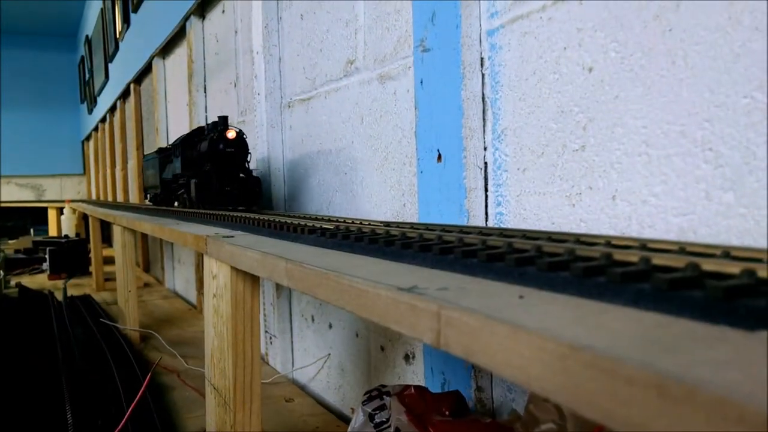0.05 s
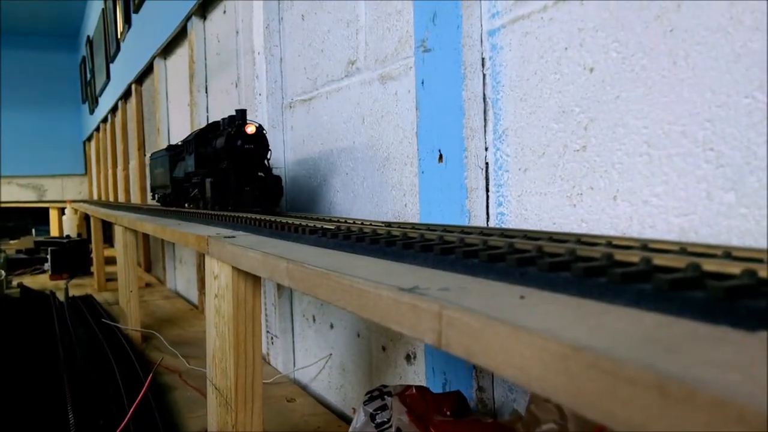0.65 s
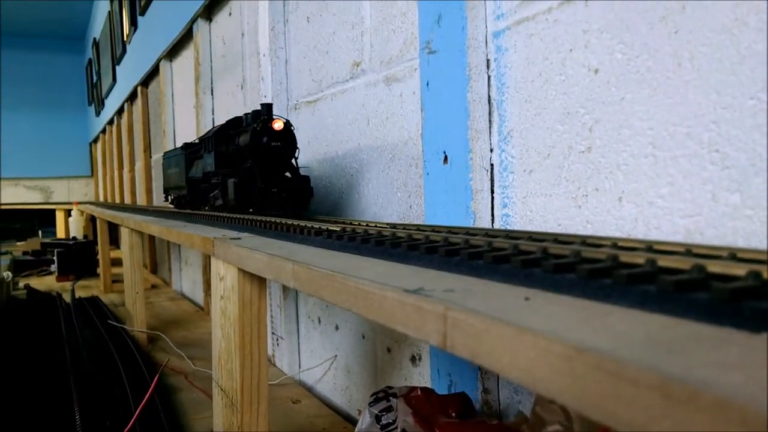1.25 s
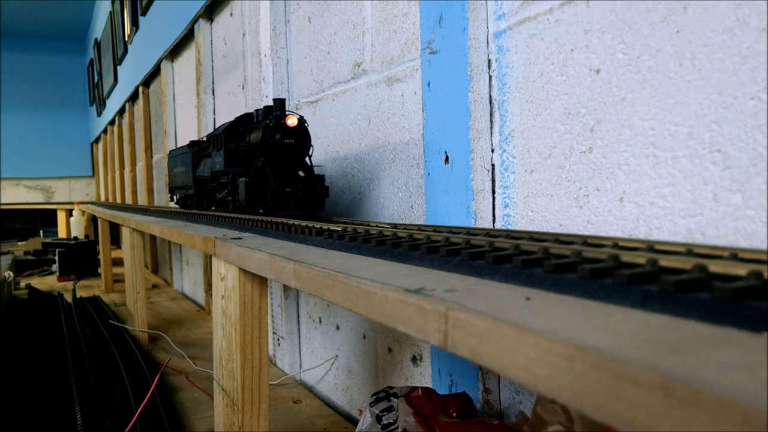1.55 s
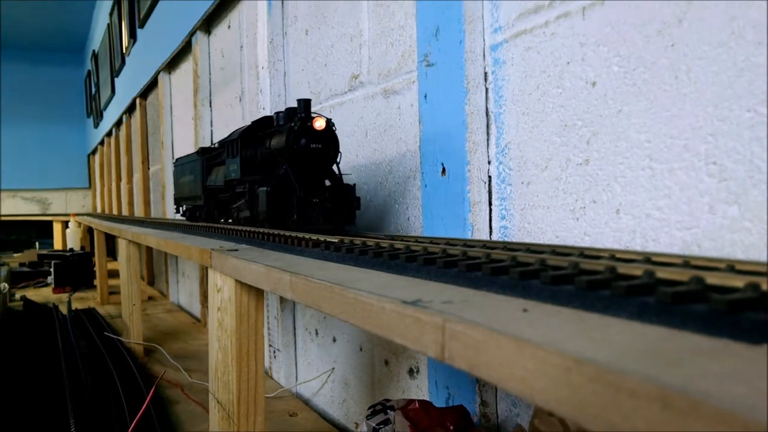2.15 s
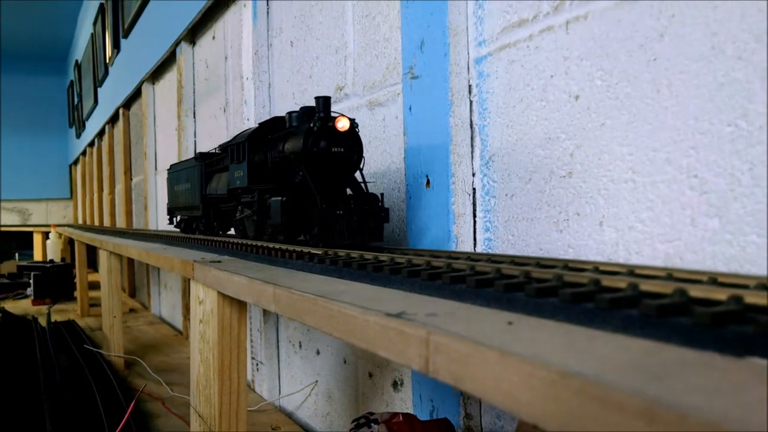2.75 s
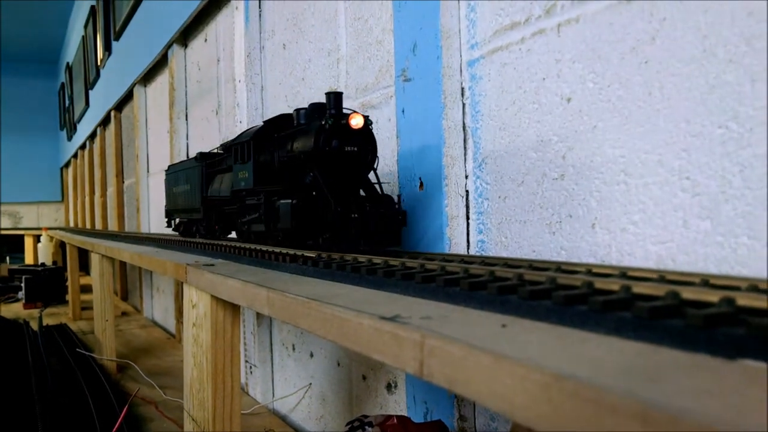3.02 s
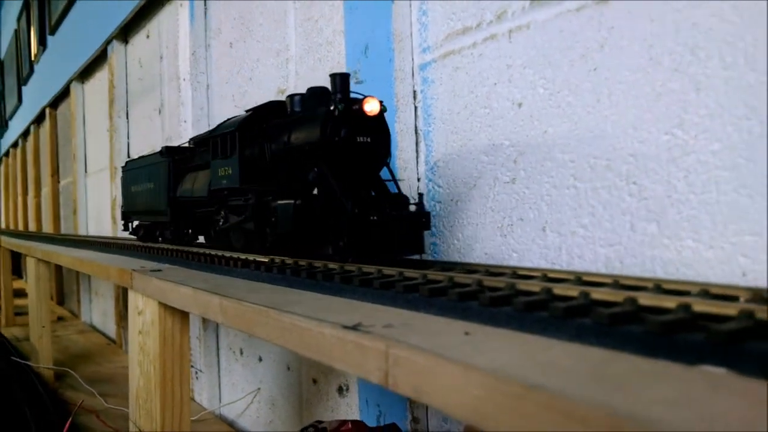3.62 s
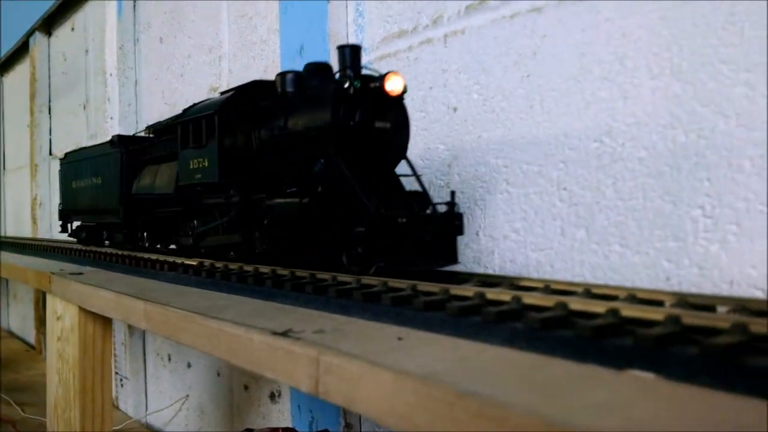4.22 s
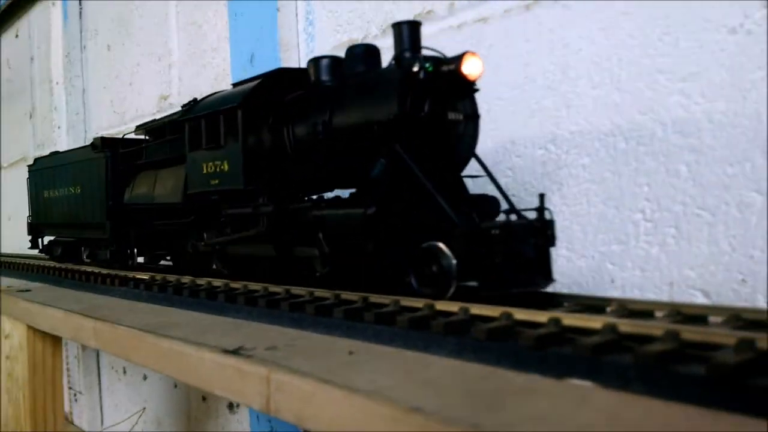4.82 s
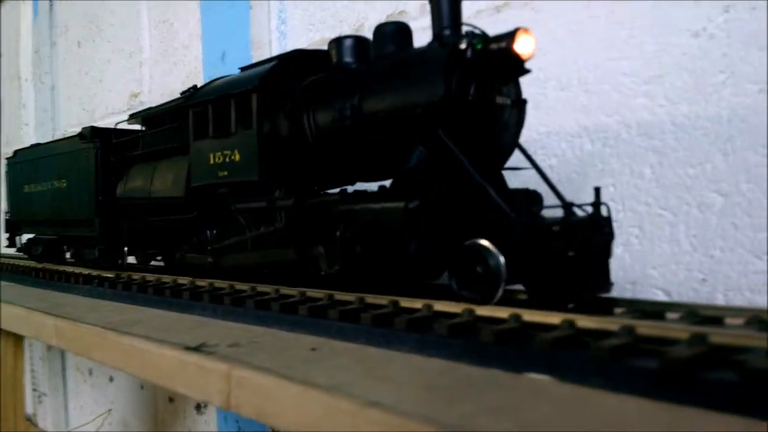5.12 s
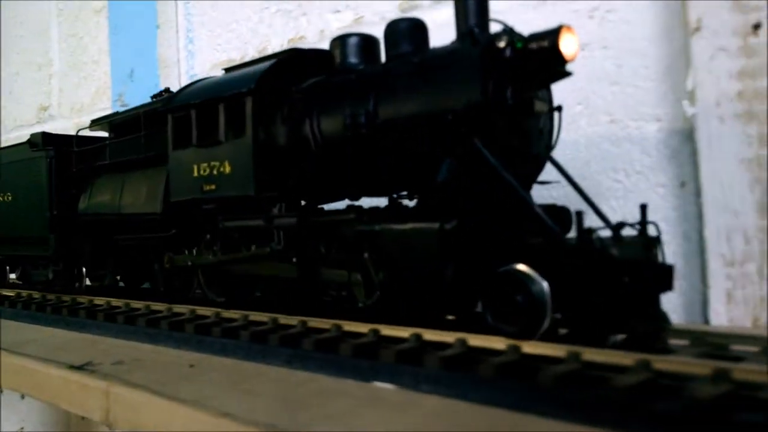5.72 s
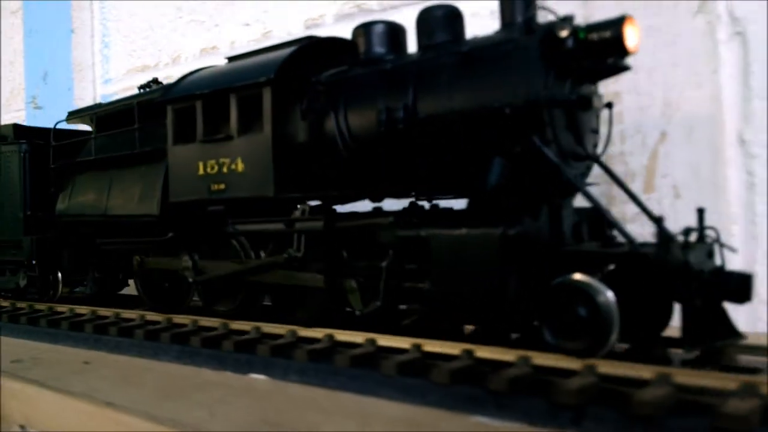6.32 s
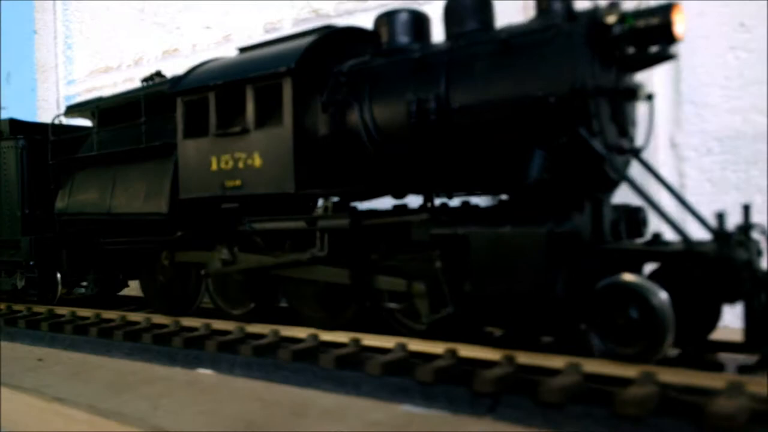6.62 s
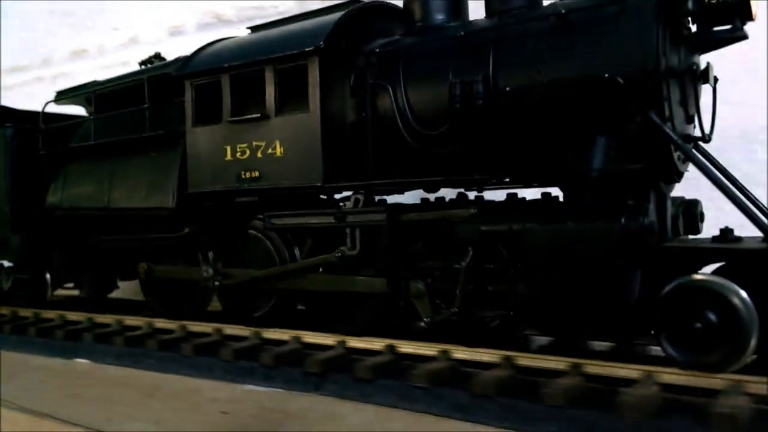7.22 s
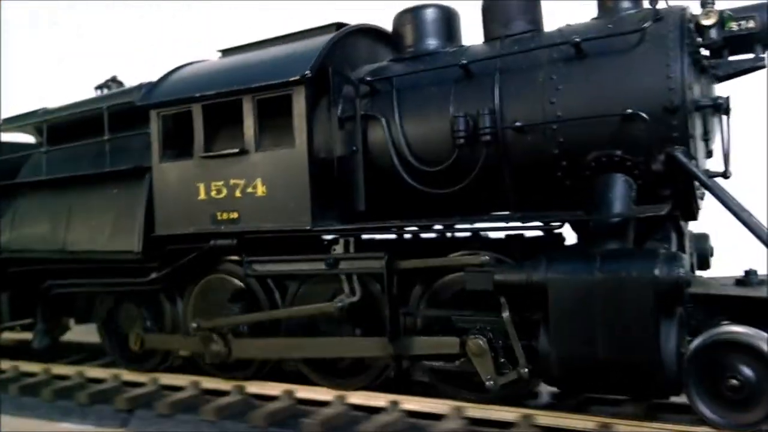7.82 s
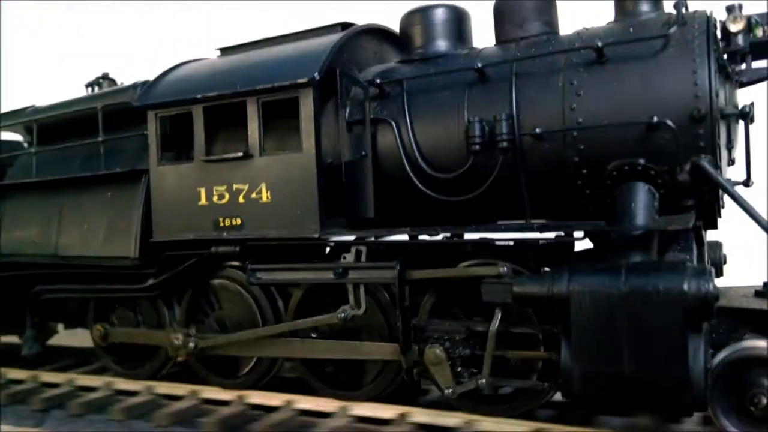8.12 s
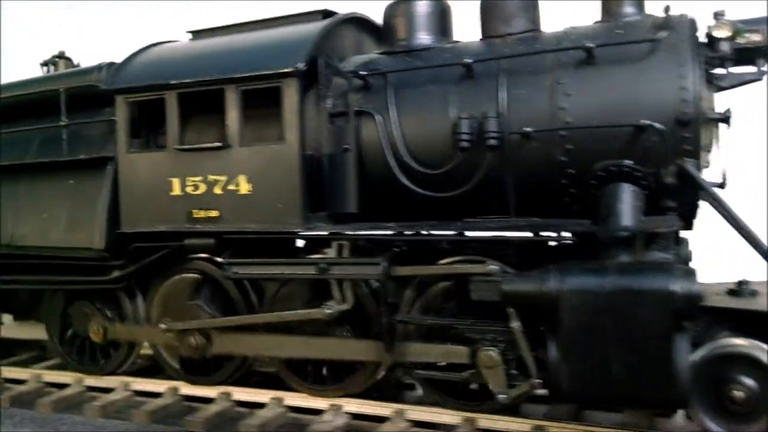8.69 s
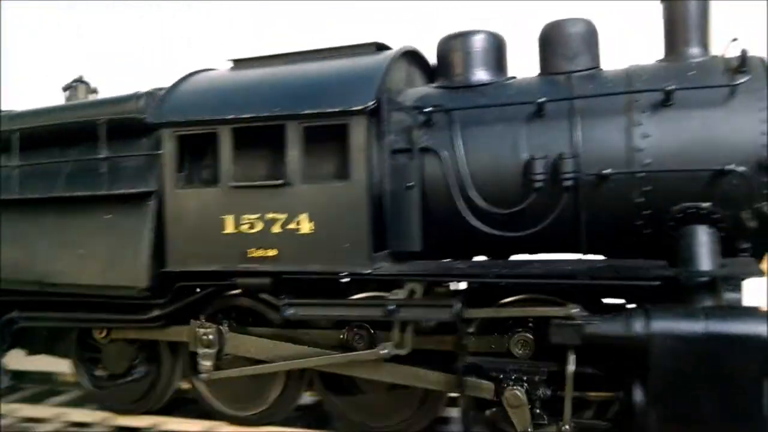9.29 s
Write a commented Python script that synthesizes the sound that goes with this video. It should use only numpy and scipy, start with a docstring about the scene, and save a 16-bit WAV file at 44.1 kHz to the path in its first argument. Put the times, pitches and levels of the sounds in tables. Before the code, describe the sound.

Heard from right beside the track of an indoor wooden layout, a small electric model train approaches slowly. Whirring gears and an on-and-off whine ride over the low rumble of the baseboard. Fast, high ticking from the motor and the hiss of metal wheels gradually build, joined by scattered clicks, soft thumps and short scrapes. The whine is strongest near the end, when the locomotive is closest.

```python
"""Beside the track of a wooden shelf layout, a model steam locomotive creeps toward the listener.
Its wheels force the baseboard into a rumble and roll over the humps of its bending modes.
They hiss and scrape along the rails, and click and ring as they strike flaws.
The motor shaft ticks and knocks once a turn over the whir of the gears,
and a narrow resonance of the drive whines on and off."""
import sys
import numpy as np
from scipy import signal
from scipy.fft import rfft, irfft, next_fast_len
from scipy.io import wavfile

SR = 44100
rng = np.random.default_rng(int(sys.argv[2]) if len(sys.argv) > 2 else 0)


def put_to_file(sound):
    """Save the sound as 16-bit audio at rate SR, in the file named by the first command-line argument."""
    columns = np.atleast_2d(sound).T  # one column per channel
    safe = np.clip(columns, -1, 1)
    whole_steps = np.round(safe * 32767)
    wavfile.write(sys.argv[1], SR, whole_steps.astype(np.int16))


N = 412335
TIME = np.arange(N) / SR
SPEED_M_PER_S = .14
NEAREST_M, ABREAST_M = 0.58, 1.114  # distance across to the track; travel to its nearest point
USUAL_ROLL_DB = -42
MESH_AT = .795  # share of a turn at which the gears are loudest
TICK_STROKE = dict(place=.192, rise_s=.0006, decay_s=.0015, scatter_db=.6)

# how hard the wheels shake the shelf (time [s], level [dB])
ROLL_FORCE = [(0.0, -39.5), (0.34, -44), (0.85, -40.5), (1.02, -36), (2.21, -39), (2.89, -36.5),
              (3.23, -42), (3.4, -41.5), (4.08, -40.5), (4.93, -38.5), (5.1, -36.5), (5.27, -36.5),
              (6.97, -46), (8.33, -41.5), (8.5, -45.5), (9.35, -40.5)]
# stereo width of the shelf's sound, narrowest near the listener (time [s], side over mid [dB])
SHELF_WIDTH = [(0, 0), (1.5, 0.5), (2.5, 1.5), (3, 2), (4.3, 4), (5.2, 2.5), (6.5, -2), (8, -3.5),
               (9.35, -3)]


def amp(db):
    """Amplitude ratio of a level in decibels."""
    return np.exp(np.asarray(db, np.float32) * np.float32(np.log(10) / 20))


def unit(x):
    """Normalisation to rms 1."""
    return x / np.sqrt(np.mean(x ** 2) + 1e-20)


def curve(rows):
    """Linear interpolation of (time [s], value) rows at every sample."""
    return np.interp(TIME, *np.transpose(rows))


def noise():
    """Two uncorrelated white noises."""
    return rng.standard_normal((2, N), dtype=np.float32)


def drift(rate_hz):
    """Band-limited random fluctuation of rms 1."""
    knots = rng.standard_normal(20000)
    return unit(np.interp(TIME * rate_hz, np.arange(len(knots)), knots))


def colour(x, points):
    """Spectral shaping by (frequency [Hz], gain [dB]) points, falling 30 dB an octave beyond the ends."""
    hz, db = np.transpose(points)
    size = next_fast_len(x.shape[-1] + 2048, True)
    octave, knots = np.log2(np.fft.rfftfreq(size, 1 / SR) + 1), np.log2(hz)
    gain_db = np.interp(octave, np.r_[knots[0] - 4, knots, knots[-1] + 4],
                        np.r_[db[0] - 120, db, db[-1] - 120])
    return irfft(rfft(x.astype(np.float32), size) * amp(gain_db), size)[..., :x.shape[-1]]


def dips(x, rows):
    """Band rejection by bell-shaped notches."""
    hz = np.fft.rfftfreq(1024, 1 / SR)
    db = sum(depth_db * np.exp(-((hz - centre) / width) ** 2) for centre, width, depth_db in rows)
    return signal.oaconvolve(x, np.fft.fftshift(irfft(amp(db)))[1:], "same")


def spread(pair, side_db, right_db=0):
    """Mid-side stereo: the sum and difference of two signals give left and right."""
    side = pair[1] * amp(side_db)
    return np.array([(pair[0] + side) * amp(-right_db / 2), (pair[0] - side) * amp(right_db / 2)])


def ring(hz, width_hz, step=64):
    """A randomly driven resonance: a tone whose amplitude and phase wander (two uncorrelated copies)."""
    phase = (2 * np.pi * (np.cumsum(hz * np.ones(N)) / SR % 1)).astype(np.float32)
    pole = np.exp(-np.pi * width_hz * step / SR)
    slow = unit(signal.lfilter([1], [1, -2 * pole, pole * pole], rng.standard_normal((4, N // step + 2))))
    sway = np.array([np.interp(TIME * SR / step, np.arange(len(row)), row) for row in slow], np.float32)
    return sway[::2] * np.cos(phase) + sway[1::2] * np.sin(phase)


def ping(age, hz, decay_s):
    """Damped free vibration of a struck part."""
    age = np.maximum(age, 0)
    return np.sin(2 * np.pi * hz * age) * np.exp(-age / decay_s)


def approach_gain(near_db, doubling_db, roll_share):
    """Distance law: level falls with each doubling of range; it also follows part of the rolling force."""
    doublings = np.log2(np.hypot(1, (SPEED_M_PER_S * TIME - ABREAST_M) / NEAREST_M))
    return amp(near_db - doubling_db * doublings + roll_share * (curve(ROLL_FORCE) - USUAL_ROLL_DB))


def stroke(turns, place, rise_s, decay_s, scatter_db):
    """Periodic impact at `place` (0-1) in each turn: the seconds since the last blow, and its envelope."""
    count = np.floor(turns - place)
    age = TIME - np.interp(count + place, turns, TIME, left=-1)
    strength = amp(scatter_db * rng.standard_normal(400))[count.astype(int) + 2]
    return age, strength * np.tanh((age / rise_s) ** 2) * np.exp(-age / decay_s)


def contact(age, envelope, spectrum, alike=.55, change_per_s=2.5, size=512):
    """Contact noise: the same spots touch each turn, so part of the grain repeats, changing slowly."""
    passed = TIME * change_per_s
    patterns = rng.standard_normal((2, int(passed[-1]) + 2, size), dtype=np.float32)
    row, blend = passed.astype(int), np.pi / 2 * (passed % 1)
    at = np.round(age * SR).astype(int) % size
    grain = np.cos(blend) * patterns[:, row, at] + np.sin(blend) * patterns[:, row + 1, at]
    friction = np.sqrt(alike) * grain + np.sqrt(1 - alike) * noise()
    return unit(colour(friction * envelope, spectrum))


def room(air_db=-65.0):
    """Noise floor: a faint steady hiss."""
    # spectrum of the hiss (frequency [Hz], gain [dB])
    air_spectrum = [(800, -15), (1400, 15), (2200, -17), (4000, 10), (7000, -20), (9500, 13), (11000, 1),
                    (13000, 10), (15500, -1)]
    return spread(unit(colour(noise(), air_spectrum)) * amp(air_db), side_db=-4, right_db=0.5)


def flange_scrapes(rough_db=3, attack_s=0.0077, release_s=0.092):
    """Sliding friction: a wheel flange rubs the rail for a moment."""
    # flange contacts (time [s], length [s], level [dB])
    rubs = [(0, 0.38, -60.5), (4.1, 0.26, -72), (4.788, 0.071, -57), (5.1, 0.059, -58),
            (6.51, 0.078, -46.5), (9.08, 0.034, -46.5), (9.142, 0.14, -53.5)]
    # friction spectrum (frequency [Hz], gain [dB])
    rub_spectrum = [(2000, -15), (3500, 3), (5000, 8.5), (6300, 5.5), (8000, 6), (10000, 0), (13000, -4),
                    (15500, -3)]
    level = sum(amp(db) * np.clip(np.minimum((TIME - s) / attack_s, 1 + (s + length - TIME) / release_s),
                                  0, 1) for s, length, db in rubs)
    rub = unit(colour(noise() * amp(rough_db * drift(300)), rub_spectrum))
    return spread(rub * level, side_db=-32)


def rail_hiss(flicker_db=1.82, grit_db=-10, grit_per_s=170, grit_size_db=2.6, crush_s=0.0042):
    """Rolling noise: metal wheels hiss on the rails and crush specks of grit."""
    # spectrum of hiss and grit (frequency [Hz], gain [dB])
    hiss_spectrum = [(1200, -2), (2300, 2.5), (3300, 6.5), (4000, 6), (5000, 2), (6500, 1), (8000, -1),
                     (10000, -4.5), (11500, -6), (13000, -6.5), (14700, -2.5), (15500, -9)]
    hiss = unit(colour(noise(), hiss_spectrum)) * amp(flicker_db * drift(60))
    specks = (rng.random(N) < grit_per_s / SR) * amp(grit_size_db * np.minimum(rng.exponential(1, N), 3.5))
    crunch = signal.lfilter([1], [1, -np.exp(-1 / (crush_s * SR))], specks)
    grit = unit(colour(noise() * crunch, hiss_spectrum)) * amp(grit_db)
    gain = approach_gain(near_db=-49, doubling_db=12.46, roll_share=0.37)
    return spread((hiss + grit) * gain, side_db=-0.5, right_db=0.5)


def motor_hum(turns, waver_db=3, hum_db=-7):
    """Harmonics of rotation: motor and gear teeth give weak tones locked to the shaft."""
    # partials (multiple of the shaft speed [1], relative level [dB])
    harmonics = [(3, -20), (7, -10), (10, -15.5), (13, -14.5), (21, -12)]
    tones = sum(amp(db + waver_db * drift(5)) * np.sin(2 * np.pi * (round(k) * turns + rng.random()))
                for k, db in harmonics)
    return np.sqrt(2) * tones * amp(curve(ROLL_FORCE) + hum_db)


def drive_whine(wander_hz=1.75, far_flutter_db=3.5, whine_db=-1.0, echo_db=-51):
    """A lightly damped resonance sings on and off, steadier as it nears; its wall echo is fuzzier."""
    # resonance of the drive (time [s], frequency [Hz], level [dB])
    whine_path = [(0, 702, -69), (.45, 687, -55), (1.3, 697, -58), (1.7, 696, -53), (2.0, 705, -67),
                  (2.4, 700, -51), (2.55, 699, -58), (2.849, 699, -51), (3.06, 698, -65), (3.22, 704, -51),
                  (3.55, 690, -51.5), (3.65, 696, -65), (3.76, 691, -51.5), (3.95, 694, -53),
                  (4.08, 690, -60), (4.301, 702, -50), (4.6, 692.7, -63), (5.1, 699, -55), (5.55, 690, -63),
                  (6.15, 692, -55), (6.36, 690.7, -49), (6.65, 705, -51.5), (6.82, 695, -58),
                  (7.0, 689, -52.5), (7.45, 695.6, -48.5), (7.8, 693, -49), (8.05, 692.4, -43.5),
                  (8.35, 695.5, -45.5), (8.65, 697, -44.5), (8.98, 701, -45.5), (9.18, 697, -54),
                  (9.35, 694, -44)]
    s, hz, db = np.transpose(whine_path)
    pitch_hz = np.interp(TIME, s, hz)
    phase = 2 * np.pi * np.cumsum(pitch_hz + wander_hz * drift(22)) / SR
    flutter_db = np.interp(SPEED_M_PER_S * TIME, [0, ABREAST_M], [far_flutter_db, 0])
    tone = np.sqrt(2) * np.sin(phase) * amp(np.interp(TIME, s, db) + whine_db + flutter_db * drift(14))
    return spread([tone, ring(pitch_hz, width_hz=17)[0] * amp(echo_db)], side_db=-3)


def housing_warble(turns, pitch_hz=1250, wander_hz=17, flutter_db=2, throb_depth=.9, level_db=-3):
    """Modulated resonance: the gear housing's sharpest ring wavers and swells just after each knock."""
    # strength of the ring (time [s], level [dB])
    ring_level = [(0, -62), (.25, -64.5), (2.05, -58.5), (2.24, -65), (2.6, -55), (3.05, -58), (3.35, -56),
                  (3.8, -60), (4.8, -64), (5.15, -59), (6.2, -57), (8.6, -55.5), (8.84, -52.5), (9.02, -48),
                  (9.1, -47), (9.15, -47), (9.25, -51), (9.35, -56)]
    phase = 2 * np.pi * np.cumsum(pitch_hz + wander_hz * drift(50)) / SR
    tone = np.sqrt(2) * np.sin(phase) * amp(flutter_db * drift(30))
    throb = 1 + throb_depth * np.cos(2 * np.pi * (turns - MESH_AT))
    return np.array([tone, ring(pitch_hz, width_hz=60)[0]]) * throb * amp(curve(ring_level) + level_db)


def tooth_noise(turns, alike=0.12, size=1344):
    """Cyclic roughness: noise that is partly the same pattern of teeth coming round every turn."""
    patterns = rng.standard_normal((2, size))
    teeth = np.array([np.interp(turns % 1 * size, np.arange(size), row) for row in patterns], np.float32)
    return np.sqrt(alike) * unit(teeth) + np.sqrt(1 - alike) * noise()


def gears(turns, whir_db=-0.4, mesh_depth=0.11, knock_db=-6, far_knock=0.35):
    """Meshing and backlash: the teeth whir, knock as their slack is taken up, and ring the housing."""
    # spectrum of the meshing teeth (frequency [Hz], gain [dB])
    whir_spectrum = [(500, -51), (800, 16), (950, 8), (1150, 11.5), (1260, 0.5), (1370, 13.5), (1470, 5),
                     (1650, 7.5), (1900, 1), (2200, -1), (2800, 3), (5000, -56)]
    # spectrum of the backlash knock (frequency [Hz], gain [dB])
    knock_spectrum = [(400, -3), (900, -32), (1250, -21.5), (1600, -8), (1950, -16), (2600, -54),
                      (6000, -46)]
    # broader housing resonances (frequency [Hz], bandwidth [Hz], relative level [dB])
    housing_modes = [(1462, 38, -8), (1885, 290, -3), (2323, 1100, -15.5)]
    mesh = 1 + mesh_depth * np.cos(2 * np.pi * (turns - MESH_AT))
    whir = unit(colour(tooth_noise(turns) * mesh, whir_spectrum)) * amp(whir_db)
    rings = sum(ring(hz, width_hz) * amp(db) for hz, width_hz, db in housing_modes)
    blow = stroke(turns, place=.655, rise_s=.0008, decay_s=.0028, scatter_db=2)
    knock = amp(knock_db) * contact(*blow, knock_spectrum)
    nearness = np.interp(TIME, [4, 7], [far_knock, 1])  # knock and rings are only distinct close by
    gain = approach_gain(near_db=-50, doubling_db=3.9, roll_share=0.33)
    gearbox = (whir + nearness * (knock + rings)) * gain + housing_warble(turns)
    return spread(gearbox, side_db=2.5, right_db=1.5)


def shelf_reflection(x, far_s=0.000395, near_s=0.000928, wobble_s=.00003, echo_db=-9):
    """Comb filtering: an echo off the shelf lags more as the engine nears, so the colour shifts."""
    lag = np.interp(SPEED_M_PER_S * TIME, [0, ABREAST_M], [far_s, near_s]) + wobble_s * drift(2.2)
    return x + amp(echo_db) * np.array([np.interp(TIME - lag, TIME, row) for row in x])


def tick_rings(turns, ring_db=-4.0, damping_s=.0009):
    """Impulse response: every tick rings the same small metal parts, whose two tones shift over time."""
    # lower resonance (time [s], frequency [Hz], relative level [dB])
    lower_ring = [(0, 10100, -16), (1.1, 9200, -0.5), (1.6, 9650, -7), (2.1, 9200, 1), (2.7, 9695, -15),
                  (3.3, 9150, -1), (3.7, 9280, -11), (4.45, 9300, 1.5), (5.3, 9350, -7), (6.1, 9250, -7.5),
                  (7.2, 8997, -5.5), (8.3, 9400, -11), (9.35, 9246, -18)]
    # upper resonance (time [s], frequency [Hz], relative level [dB])
    upper_ring = [(0, 13700, -8), (.7, 13000, -2), (1.6, 12200, -1), (1.9, 12700, -8), (2.2, 13400, -4),
                  (3.85, 13350, -3), (3.98, 12100, -24), (4.1, 11000, -6), (5.1, 10800, -8),
                  (5.5, 11900, -9), (5.95, 12100, -5), (7.4, 12490, -13), (8.1, 13360, -5),
                  (9.35, 13900, -9)]
    age, envelope = stroke(turns, **TICK_STROKE)
    out = 0
    for path in (lower_ring, upper_ring):
        s, hz, db = np.transpose(path)
        phase = 2 * np.pi * np.interp(TIME, s, hz) * age
        tone = np.array([np.sin(phase), np.cos(phase)]) * envelope * np.exp(-age / damping_s)
        out = out + unit(tone) * amp(ring_db + np.interp(TIME, s, db))
    return out


def shaft_ticks(turns, tick_db=-2, touch_db=-11):
    """Periodic contact: the shaft ticks once a turn, with a weaker touch just before."""
    # spectrum of the tick (frequency [Hz], gain [dB])
    tick_spectrum = [(1500, -39), (4000, -2.5), (6500, 1), (7900, -1.5), (8500, 4), (9200, 9.5), (10200, 2),
                     (11400, -3.5), (12300, 6), (13500, 1), (14500, 2), (15500, -9)]
    # spectrum of the weaker touch (frequency [Hz], gain [dB])
    touch_spectrum = [(2000, -36), (6000, -1), (7000, 8), (7800, 14), (9000, 10), (11000, 0), (14000, 10),
                      (15500, -2)]
    tick = amp(tick_db) * contact(*stroke(turns, **TICK_STROKE), tick_spectrum)
    light_blow = stroke(turns, place=.9, rise_s=.0007, decay_s=.0014, scatter_db=1.8)
    touch = amp(touch_db) * contact(*light_blow, touch_spectrum)
    ticks = shelf_reflection(tick + touch) + tick_rings(turns)
    gain = approach_gain(near_db=-51, doubling_db=13.6, roll_share=0.14)
    return spread(ticks * gain, side_db=-3.0, right_db=9.0)


def wheel_clicks(click_db=-5.0, crack_db=12.3, crack_at_s=0.001512, echo_s=0.000574, bright_db=14,
                 rise_s=0.00069, decay_s=0.0027, tail_db=-26, tail_s=0.087, thump_s=0.018):
    """Impact excitation: a wheel drops over a flaw, rattles, rings with the chassis and thumps the shelf."""
    # rail flaws, levels relative (time [s], level [dB], treble [dB], crack [dB], thump [dB],
    # chassis ring [Hz], its level [dB], wheel ring [Hz], its level [dB])
    flaws = [(2.8776, -22, -12, -1, -6.5, 3770, -4, 10000, -18),
             (2.9413, -37, -1, 0, -15, 3500, -9, 6550, -1), (3.3603, -29, -9, -10, 2, 3350, 3, 7900, -11),
             (3.3776, -30, -9, 1, -9, 3000, 2, 13700, -12), (3.4707, -36, -7, -1, -9, 3500, -8, 6500, -5),
             (3.8819, -34.5, -8, -13, -0.5, 2914, 1, 12300, 1),
             (4.0317, -27, -15, -11, -10, 2850, 2, 6900, -12),
             (4.3542, -24.5, -8, -15, -8.5, 3170, -2, 6560, -0.5),
             (4.3835, -35, -3, -3, -4, 3200, -10, 6410, -1),
             (4.802, -27.5, -8, -4, -15, 3300, -5, 7500, -14),
             (5.1205, -31, -7, -7, 3, 3373, -17, 6600, -6),
             (5.1438, -36, -22, -3, 4.5, 3200, -10, 6600, -14),
             (5.4647, -32.5, -14, -4, 2.5, 3000, -4, 7400, -9),
             (5.7463, -29, -2, -6, -4, 3200, -4, 10030, -6),
             (5.9711, -24.5, -13, -1, -6.5, 3100, -7, 12240, -19),
             (6.3229, -27, -9, -1, -9, 3390, -18, 7580, -14),
             (6.7245, -30.5, -6, 3, -8, 3900, -7, 6490, -12),
             (7.2141, -34, -13, -4, 4, 3400, -11, 7520, -14),
             (7.6759, -30, -14, -3, -7, 3305, -3, 10260, -8),
             (8.6171, -28, 1, -5, -10, 3600, -7, 7700, -11),
             (9.1111, -33, -16, -1, -2, 3396, -7, 6520, -12),
             (9.124, -31, -9, -3, -6, 3380, -12, 6500, -12),
             (9.2466, -29, -5, -2, -4.5, 3400, -13, 7500, -12)]
    # spectrum of the rattle before its treble tilt (frequency [Hz], gain [dB])
    rattle_spectrum = [(70, 9), (170, -2), (320, -17), (600, -10.5), (1200, -15), (1800, -28), (2500, -9.5),
                       (3700, 4.5), (5000, -3.5), (6400, -2.5), (8500, -10), (11000, -15), (15500, -23)]
    # spectrum of the struck wood (frequency [Hz], gain [dB])
    thump_spectrum = [(120, -5), (280, 17), (550, 1), (1000, 0), (1400, -1.5), (1800, 2.5), (2400, -4.5),
                      (3500, -10)]
    out, t = np.zeros((2, N)), np.arange(6000) / SR
    landed = t - crack_at_s - np.array([[0], [echo_s]])  # the tread lands; the wall answers from the side
    attack = 1 - np.exp(-t / rise_s)
    rattle_shape = attack * (np.exp(-t / decay_s) + amp(tail_db) * np.exp(-t / tail_s))
    thump_shape = attack * np.exp(-t / thump_s)
    for s, db, treble_db, tread_db, shelf_db, chassis_hz, chassis_db, wheel_hz, wheel_db in flaws:
        crack = amp(crack_db + tread_db) * np.sinc(landed * SR)
        tilted = [(hz, level + (treble_db + bright_db) * np.clip((hz - 5000) / 5000, 0, 1))
                  for hz, level in rattle_spectrum]
        rattle = colour(rng.standard_normal((2, len(t))) * rattle_shape + crack, tilted)
        chassis = amp(chassis_db) * ping(landed, chassis_hz, decay_s=0.00065)
        wheel = amp(wheel_db) * ping(landed, wheel_hz, decay_s=0.0012)
        thump = amp(shelf_db) * colour(rng.standard_normal((2, len(t))) * thump_shape, thump_spectrum)
        part = out[:, round(s * SR):][:, :len(t)]
        part += 2 * amp(db + click_db) * (rattle + chassis + wheel + thump)[:, :part.shape[1]]
    return spread(out, side_db=0.5, right_db=3.0)


def shelf_rumble(rumble_db=-47, roll_share=0.16, uneven_db=1.46):
    """Forced vibration: the rolling wheels shake the wooden baseboard over a broad band."""
    # response of the board (frequency [Hz], gain [dB])
    board_spectrum = [(100, -5), (150, -0.5), (200, 7), (300, 2.5), (460, 0), (620, 4), (780, 1.5),
                      (860, -8.5), (1000, -2), (1300, -31)]
    swing_db = roll_share * (curve(ROLL_FORCE) - USUAL_ROLL_DB)
    rumble = unit(colour(noise(), board_spectrum)) * amp(rumble_db + swing_db + uneven_db * drift(25))
    return spread(rumble, curve(SHELF_WIDTH) - 1)


def shelf_boom(midway_db=-58.0, rise_db_per_s=0.92):
    """A moving load: the shelf's deep boom grows as the engine nears and swells at loose spots."""
    # crossings of loose spots (time [s], length [s], level [dB])
    loose_spots = [(1.854, 0.075, -54), (2.92, 0.14, -47), (3.397, 0.09, -44), (3.683, 0.13, -60),
                   (4.365, 0.07, -51), (5.152, 0.6, -76), (6.745, 0.12, -59), (8.169, 0.14, -49),
                   (8.921, 0.072, -53), (9.264, 0.12, -62)]
    # bass response of the shelf (frequency [Hz], gain [dB])
    boom_spectrum = [(20, -26), (40, -7.5), (60, -4.5), (80, -1), (96, 6.5), (110, -16), (122, 6), (140, 1),
                     (200, -43)]
    swells = sum(amp(db) * np.exp(-(2 * (TIME - s) / length) ** 2) for s, length, db in loose_spots)
    growth = amp(midway_db + rise_db_per_s * (TIME - TIME.mean()))
    boom = unit(colour(noise(), boom_spectrum)) * (growth + swells)
    return spread(boom, curve(SHELF_WIDTH) + 2, right_db=-0.5)


def shelf_mode(path, width_hz, level_db, side_db, detune=.015, detune_rate_hz=5):
    """Mass loading: one randomly driven mode of the shelf is detuned by the rolling weight."""
    s, hz, db = np.transpose(path)
    shaken = ring(np.interp(TIME, s, hz) * (1 + detune * drift(detune_rate_hz)), width_hz)
    return spread(shaken * amp(level_db + np.interp(TIME, s, db)), curve(SHELF_WIDTH) + side_db)


def bending_modes():
    """Standing waves: five modes of the shelf shift, swell and fade as the wheels roll along their shapes."""
    # bending modes, lowest first (time [s], frequency [Hz], level [dB])
    deep = [(0, 120, -62), (0.85, 132, -54.5), (1.5, 125, -64), (2.4, 106.4, -56), (2.9, 98.74, -46),
            (3.4, 107, -55.5), (4, 126, -51), (4.45, 135.5, -54.5), (5, 158.3, -57), (5.7, 163.8, -49),
            (6.4, 156.6, -56), (9.35, 178.3, -48)]
    low = [(0, 212, -54), (0.6, 222.8, -53), (1, 218, -44), (1.5, 222, -47.5), (2.2, 222.7, -54),
           (2.85, 223.7, -42.5), (3.2, 224.8, -47), (3.7, 231.4, -47), (4.2, 199.9, -55),
           (4.7, 234.7, -47.5), (5.3, 278.9, -48), (5.75, 272.7, -44), (6.5, 264.6, -45.5),
           (7.6, 278.8, -48), (8.3, 279.2, -50), (9.35, 259.7, -43.5)]
    middle = [(0, 323, -56), (1, 327, -52), (2.1, 337, -45.5), (2.9, 333, -46), (3.6, 334, -57),
              (4.5, 335, -56), (5.1, 339, -39.5), (5.6, 353, -54), (6.8, 345, -53.5), (8, 347, -45.5),
              (9.35, 352, -58.5)]
    high = [(0, 440, -54.5), (0.7, 433, -50.5), (1.1, 449, -46), (2.3, 456, -46.5), (2.85, 420, -45.5),
            (3.6, 424, -51), (4.3, 437, -47.5), (4.7, 408, -50.5), (5.1, 428, -39.5), (5.6, 402, -44),
            (6.2, 419, -44.5), (7.3, 406, -49), (9.35, 434, -50)]
    top = [(0, 615, -68), (1, 619, -52), (2.1, 603.3, -56), (2.75, 614, -47), (3.4, 585, -56),
           (4.1, 595, -54.5), (5.1, 602, -51), (5.8, 596, -55), (6.7, 536.5, -52), (7.6, 529.4, -50),
           (9.35, 544.7, -56)]
    return (shelf_mode(deep, width_hz=53, level_db=-2.2, side_db=2.3)
            + shelf_mode(low, width_hz=72, level_db=0.075, side_db=1.1)
            + shelf_mode(middle, width_hz=59, level_db=-0.74, side_db=-1.5)
            + shelf_mode(high, width_hz=87, level_db=-0.029, side_db=-4)
            + shelf_mode(top, width_hz=118, level_db=-0.29, side_db=-1))


def scene():
    """Superposition of the shelf, the drive, the wheels and the room."""
    # motor speed (time [s], rate [turns/s])
    shaft_speed = [(0.0, 32.16), (1.21, 31.28), (2.95, 33.86), (3.06, 32.15), (3.36, 33.99), (3.53, 32.2),
                   (4.29, 34.14), (5.08, 33.29), (5.87, 31.52), (5.97, 30.71), (6.23, 32.43), (6.8, 31.51),
                   (7.13, 33.46), (7.56, 32.18), (8.13, 33.28), (8.75, 32.57), (9.14, 34.98), (9.35, 31.35)]
    turns = np.cumsum(curve(shaft_speed)) / SR
    shelf = shelf_rumble() + shelf_boom() + bending_modes()
    drive = shaft_ticks(turns) + gears(turns) + motor_hum(turns) + drive_whine()
    wheels = rail_hiss() + flange_scrapes() + wheel_clicks()
    return shelf + drive + wheels + room()


def record(dry, edge_hz=15700):
    """Narrow notches hollow out a few bands of the stereo sum and difference; a low-pass limits the treble."""
    # notches in the stereo sum (frequency [Hz], width [Hz], gain [dB])
    sum_dips = [(2631, 235, -12.5), (5260, 230, -3)]
    # notches in the stereo difference (frequency [Hz], width [Hz], gain [dB])
    difference_dips = [(714, 300, -1), (1306, 520, -18), (3920, 250, -11)]
    mid = dips((dry[0] + dry[1]) / 2, sum_dips)
    side = dips((dry[0] - dry[1]) / 2, difference_dips)
    low_pass = signal.firwin(301, edge_hz, window=("kaiser", 9), fs=SR)
    return signal.oaconvolve(np.array([mid + side, mid - side]), low_pass[None], "same", axes=1)


dry = scene()
out = record(dry)
put_to_file(out)
```